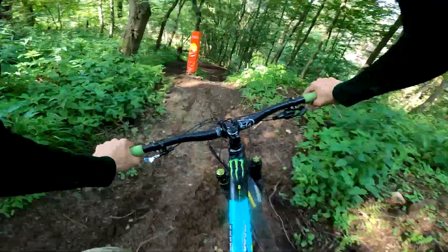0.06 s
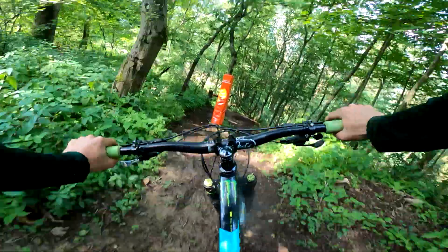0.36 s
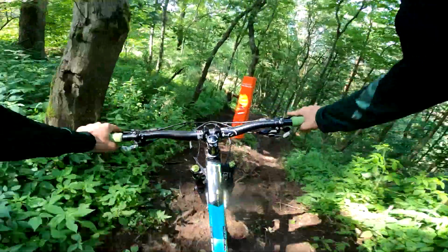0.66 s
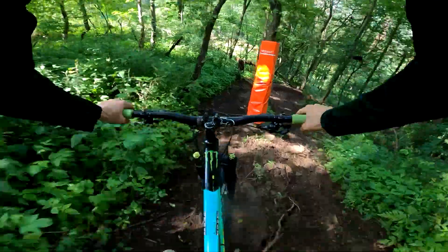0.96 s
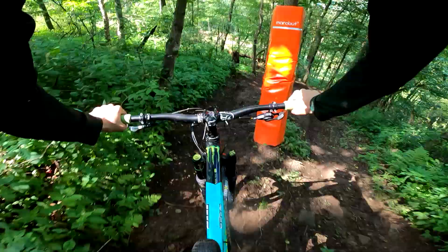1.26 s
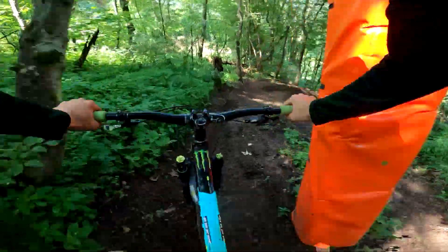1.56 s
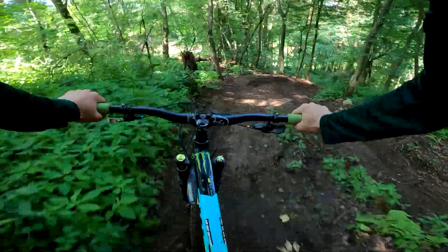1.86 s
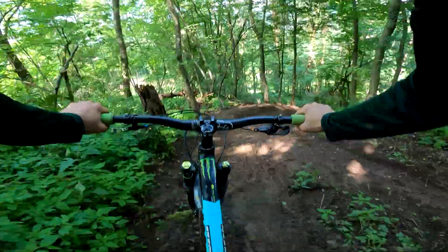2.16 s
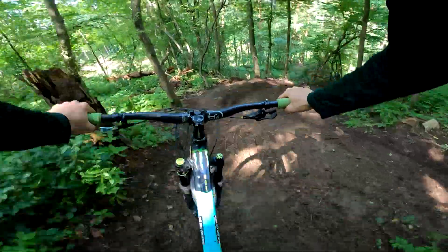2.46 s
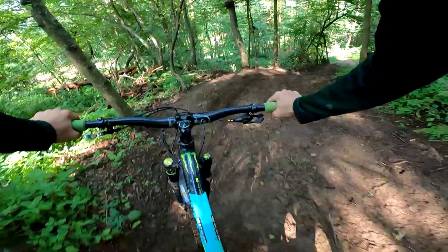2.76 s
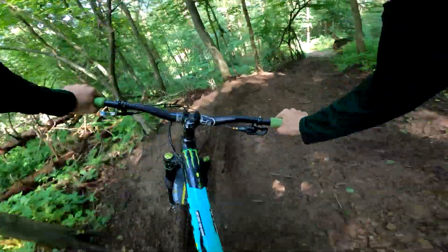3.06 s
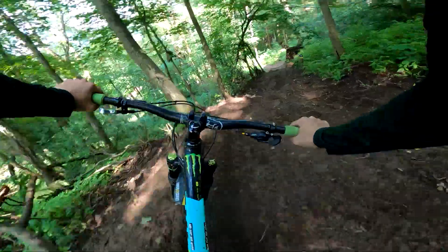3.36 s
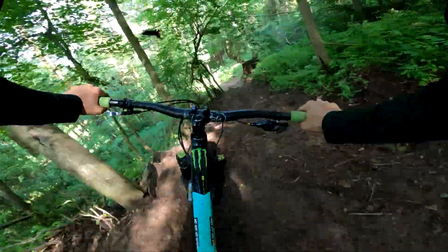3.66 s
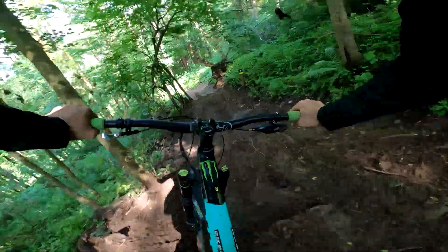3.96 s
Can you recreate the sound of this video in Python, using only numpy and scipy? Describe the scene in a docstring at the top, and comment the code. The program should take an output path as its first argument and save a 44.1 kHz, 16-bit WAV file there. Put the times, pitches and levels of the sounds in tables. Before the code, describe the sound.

A loud, wavering howl comes from wet mountain bike brakes, once at the start and twice more after a bumpy stretch of thuds and clacks. Heard from the rider's chest, with tyres crunching over soil and wind buffeting the microphone.

```python
"""A dirt trail, heard from the chest of a mountain biker riding down it. The wet disc brakes howl in
three pulls: two rotors stick and slip at nearby pitches and beat against each other, with brief, very
high chirps of pad on steel. Tyres rumble and crunch over the soil, the wheels whirr and wind thumps
on the microphone. Between the first two pulls, roots thud through the frame and bumps set off most
of the rattles."""
import sys
import numpy as np
from scipy.fft import rfft, irfft, next_fast_len
from scipy.io import wavfile
from scipy.ndimage import uniform_filter1d, minimum_filter1d, map_coordinates

SR = 44100
rng = np.random.default_rng(int(sys.argv[2]) if len(sys.argv) > 2 else 0)


def output_pcm(signal):
    """Save a mono or channel-first signal as 16-bit PCM at the path in sys.argv[1].

    Samples are clipped to [-1, 1] before scaling.
    """
    pcm = np.clip(np.atleast_2d(signal).T, -1, 1) * 32767
    wavfile.write(sys.argv[1], SR, np.round(pcm).astype(np.int16))


N = 176400


def amp(db):
    """Decibels to gain."""
    return 10 ** (np.asarray(db) / 20)


def unit(x):
    """Scale to rms 1."""
    return x / np.sqrt(np.mean(np.abs(x) ** 2) + 1e-20)


def clock():
    """Time of every sample in seconds."""
    return np.arange(N) / SR


def along(points, hz):
    """Read (Hz, value) points on a log frequency axis."""
    freqs, values = np.transpose(points)
    return np.interp(np.log(hz + 1), np.log(freqs + 1), values)


def curves(rows):
    """One automation curve for each column after the time."""
    times, *columns = np.transpose(rows)
    return [np.interp(clock(), times, column) for column in columns]


def wobble(rate):
    """A smooth random curve, rate knots a second."""
    return map_coordinates(rng.standard_normal(8192), [clock() * rate], mode="wrap")


def filtered(x, response):
    """Equalise x with a gain given as a function of frequency."""
    size = next_fast_len(N + 8192)
    return irfft(rfft(x, size) * response(np.fft.rfftfreq(size, 1 / SR)), size)[..., :N]


# Stereo image of the noises. Each row: frequency in Hz, left-right coherence (1 is mono).
COHERENCE = [(90, 1), (180, .999999), (1400, .99999), (2200, .9996), (4000, .992), (9000, .988),
             (11000, .985), (13000, .65)]


def noise(colour, grain_db=0):
    """Nearly mono coloured noise of rms 1; grain_db clumps it into millisecond grains."""
    def mid_side_gains(hz):
        width = np.arccos(np.clip(along(COHERENCE, hz), -1, 1)) / 2
        return amp(along(colour, hz)) * [np.cos(width), np.sin(width)]

    white = rng.standard_normal((2, N)) * amp(grain_db * wobble(700))
    mid, side = filtered(white, mid_side_gains)
    return unit(np.array([mid + side, mid - side]))


def rotor(pitch, partials, rough, jitter, jitter_rate, flutter_db, flutter_rate, scatter, shift_hz=0):
    """Stick-slip tone: the pitch jitters, the grip falters, and the partials drift, blur and flare."""
    phase = 2 * np.pi * np.cumsum(pitch * (1 + jitter * rough * wobble(jitter_rate))) / SR
    falter = np.tanh(0.42 * amp(flutter_db * rough * wobble(flutter_rate)))
    shift = 2 * np.pi * shift_hz * clock()
    out = np.zeros(N)
    for k, db in partials:
        order = min(k, 4)
        spread = scatter * rough * order
        blur = 1 + spread * (wobble(55 * order) + 1j * wobble(55 * order))
        flare = amp(4 * wobble(45) * (k > 2))
        drift = 0.23 * order * wobble(15) - k * np.pi / 2
        grip = unit(blur * falter * flare / np.sqrt(1 + 2 * spread ** 2))
        out += amp(db) * np.sqrt(2) * np.imag(grip * np.exp(1j * (k * phase + drift + shift)))
    return out


# The howl's envelopes, one list per pull of the brakes. Each row: time in seconds, then relative
# levels in dB of the fundamental, the octave, the third partial and the upper partials.
PULLS = [
    [(0.0, -24, -22.5, -40, -44), (0.016, -25.5, -25.5, -40, -40), (0.086, -21, -22, -39, -49.5),
     (0.29, -27.5, -32, -53, -62), (0.332, -25.5, -33.5, -45, -54), (0.374, -23, -27.5, -44, -54),
     (0.402, -26, -27.5, -32, -42), (0.466, -22.5, -29.5, -48, -61), (0.524, -34, -35.5, -55, -69),
     (0.552, -36.5, -34, -44, -72), (0.634, -33, -42.5, -53, -67), (0.684, -47, -42, -71, -73),
     (0.706, -41, -56, -58, -59), (0.718, -37, -58, -73, -73), (0.8, -45, -65, -71, -69)],
    [(1.7, -34, -52, -63, -47), (1.844, -26, -40.5, -51, -55), (1.914, -31, -27, -47, -70),
     (1.986, -25.5, -26, -32, -37.5), (2.006, -17.5, -33.5, -37, -52), (2.052, -30.5, -24, -33, -41.5),
     (2.114, -22.5, -27, -32, -40.5), (2.146, -26, -35.5, -49, -47), (2.194, -32, -29.5, -38, -48),
     (2.248, -24, -34.5, -46, -59.5), (2.316, -30.5, -16.5, -28, -40.5), (2.332, -33, -28.5, -35, -42),
     (2.396, -28.5, -23.5, -36, -50), (2.522, -44, -44, -64, -56), (2.544, -32.5, -46, -66, -77),
     (2.58, -47, -58, -73, -72)],
    [(2.68, -44, -47.5, -53.5, -54), (2.724, -42, -51, -62, -59), (2.778, -38.5, -45, -53, -54),
     (2.808, -43.5, -41, -66, -74), (2.888, -25, -24, -37.5, -48.5), (2.94, -25, -29, -30, -40),
     (2.958, -20.5, -28.5, -33, -55), (3.01, -28.5, -31.5, -48, -56), (3.05, -21, -25, -33.5, -47.5),
     (3.072, -18.5, -21, -27, -38), (3.164, -28, -32, -42, -43), (3.18, -28.5, -29.5, -26, -33.5),
     (3.23, -25.5, -29.5, -51, -50.5), (3.264, -27.5, -23.5, -34, -48.5), (3.414, -31.5, -27.5, -46, -52),
     (3.448, -26, -21.5, -27, -44), (3.606, -27, -25, -32.5, -41.5), (3.62, -29.5, -22.5, -38, -45),
     (3.756, -32.5, -20.5, -38.5, -44), (3.778, -39.5, -31, -44, -55), (3.826, -30, -24.5, -44.5, -47),
     (3.886, -34.5, -33.5, -53, -76), (3.904, -35, -32, -42.5, -49), (4.0, -31.5, -33, -42, -57)],
]
# The howl's bright edge. Each row: harmonic number, dB against the upper partials' envelope.
UPPER_PARTIALS = [(4, -0.5), (5, -6), (6, -18), (7, -12), (8, -17), (9, -21.5), (10, -23.5), (13, -25.5)]
# The main rotor's wavering note. Each row: time in seconds, pitch in Hz.
HOWL_PITCH = [(0, 702), (.13, 694.1), (.27, 680.7), (.42, 696), (.5, 687), (.66, 666.8), (.8, 689.4),
              (1.9, 682.2), (2.0, 697), (2.12, 708.2), (2.2, 686.2), (2.42, 686.5), (2.6, 677),
              (2.9, 693.1), (3.05, 700), (3.14, 718.5), (3.2, 684.9), (3.27, 682), (3.46, 695), (3.62, 690),
              (3.75, 678), (3.82, 697.5), (3.87, 676.6), (3.93, 709.3), (4, 697)]
# The second rotor's bite against the first. Each row: time in seconds, relative level in dB.
SECOND_GRIP = [(0, 3), (.27, 6), (.4, 1.5), (.7, -2.5), (1.8, 3.5), (2, -6), (2.12, -6), (2.24, 9.5),
               (2.32, -9), (2.45, 4), (2.9, -7), (3.08, -7), (3.2, -1.5), (3.35, 0), (3.5, -10), (3.6, 0),
               (3.74, -8), (3.95, -1)]
# EQ of the rubbing pads. Each row: frequency in Hz, gain in dB.
RASP_EQ = [(300, -64), (600, 11.5), (1000, -8), (1750, 7.5), (2500, -11), (4000, -10), (6000, -34),
           (9000, -36), (12000, -37), (15500, -33)]
SECOND_MEAN_HZ, SECOND_TILT_DB_PER_OCTAVE = 742.2, -8


def brakes():
    """Two rotors howl over rasping pads; the second roughens the first and makes sum tones with it."""
    fundamental_db, octave_db, third_db, upper_db = curves(np.vstack(PULLS))
    third_db = np.minimum(third_db, octave_db - 6.5)
    upper_db = np.minimum(upper_db, octave_db - 8)
    pitch, = curves(HOWL_PITCH)
    grip_db, = curves(SECOND_GRIP)
    totals = [(1, fundamental_db + 0.5), (2, octave_db + 1), (3, third_db + 1)]
    totals += [(round(k), upper_db + db) for k, db in UPPER_PARTIALS]
    # Each partial's power is shared among the two rotors and their sum tones.
    main_partials, second_partials, sum_partials = [], [], []
    sum_db = grip_db - 8
    for k, total_db in totals:
        second_db = grip_db - 0.5 + SECOND_TILT_DB_PER_OCTAVE * np.log2(k)
        main_db = total_db - 10 * np.log10(1 + amp(second_db) ** 2 + (k > 1) * amp(sum_db) ** 2)
        main_partials.append((k, main_db))
        second_partials.append((k, main_db + second_db))
        sum_partials.append((k, main_db + sum_db))
    main = rotor(pitch, main_partials, rough=amp(0.45 * grip_db),
                 jitter=0.011, jitter_rate=170, flutter_db=2.5, flutter_rate=120, scatter=0.3)
    second = rotor(SECOND_MEAN_HZ * pitch / pitch.mean(), second_partials[:4], rough=0.918,
                   jitter=0.01612, jitter_rate=90, flutter_db=2.5, flutter_rate=70, scatter=0.9)
    sum_tones = rotor(pitch, sum_partials[1:5], rough=0.895, shift_hz=SECOND_MEAN_HZ - pitch.mean(),
                      jitter=0.014, jitter_rate=90, flutter_db=4, flutter_rate=38, scatter=0.6)
    rasp = amp(upper_db - 3) * noise(RASP_EQ)
    # The howl ducks between the first pull and the second.
    let_go, pull = PULLS[0][-1][0], PULLS[1][0][0]
    duck = np.interp(clock(), [let_go, let_go + 0.22, pull - 0.05, pull, pull + 0.19],
                     [0.99, 0.14, 0.11, 0.67, 1])
    return duck * (main + second + sum_tones + rasp)


# Fader moves for the tyres' low rumble, midrange scrub, gritty crunch and airy hiss.
# Each row: time in seconds, relative level in dB.
RUMBLE_FADER = [(0, -20.5), (.08, -31.5), (.5, -41.5), (.6, -45), (.75, -47), (.95, -54), (1.11, -50),
                (1.16, -35.5), (1.4, -32), (1.6, -29), (1.8, -30.5), (2.06, -28.5), (2.3, -32.5),
                (2.4, -41), (2.49, -28), (2.56, -40), (2.76, -28), (3, -36), (3.3, -35.5), (3.6, -42.5),
                (4, -43.5)]
SCRUB_FADER = [(0.0, -46), (0.27, -43), (0.3, -37), (0.83, -60.5), (1.51, -44), (1.55, -43), (1.61, -42.5),
               (1.85, -37.5), (1.86, -42.5), (2.27, -38), (2.29, -50), (2.49, -37), (2.54, -50.5),
               (2.86, -42.5), (3.73, -57.5), (4.0, -47)]
CRUNCH_FADER = [(0.02, -52.5), (0.86, -64.5), (0.99, -56), (1.68, -47.5), (1.72, -45.5), (1.78, -46.5),
                (1.89, -47), (2.04, -56), (2.07, -49.5), (2.49, -55.5), (2.52, -65.5), (2.95, -53),
                (2.99, -59), (3.1, -52.5), (3.43, -60.5), (3.48, -47), (3.58, -60), (4.0, -64.5)]
HISS_FADER = [(0, -70), (.6, -62.5), (.85, -63), (1.2, -58.5), (1.7, -76), (2.05, -69), (2.5, -73),
              (2.65, -61), (2.9, -61), (4, -65.5)]
# EQ of the same four layers. Each row: frequency in Hz, gain in dB.
RUMBLE_EQ = [(30, -7.5), (100, -2), (160, -1.5), (205, 3.5), (265, -4.5), (335, 0.5), (440, -5.5),
             (520, -15), (900, -20), (2500, -73)]
SCRUB_EQ = [(200, -31), (500, 4), (750, 5), (1100, -2), (1600, 0.5), (2100, -9.5), (2600, -13), (3200, -21),
            (6000, -45)]
CRUNCH_EQ = [(1200, 6.5), (2500, 2.5), (3800, 5.5), (5500, 1.5), (7800, -7), (9000, -5), (11000, -12.5),
             (12800, -20), (14000, -40), (15700, -47)]
HISS_EQ = [(3000, -33), (5500, -6), (7500, 0.5), (9000, 0.5), (10500, 0), (12000, -5.5), (14000, -10),
           (15700, -29)]


def tyres():
    """Knobbly tyres drum on the ground, scrub the soil, crunch grit and hiss."""
    bumps = wobble(35.46)
    rumble = amp(curves(RUMBLE_FADER)[0] - 2 + 1.67 * bumps) * noise(RUMBLE_EQ, grain_db=5)
    scrub = amp(curves(SCRUB_FADER)[0] + 5 + 2.42 * bumps) * noise(SCRUB_EQ, grain_db=3.5)
    crunch_db = curves(CRUNCH_FADER)[0] + 4.5 + 1.93 * bumps + 1.8 * wobble(120)
    crunch = amp(crunch_db) * noise(CRUNCH_EQ, grain_db=1)
    hiss = amp(curves(HISS_FADER)[0] + 1.3 * wobble(120)) * noise(HISS_EQ, grain_db=2)
    return rumble + scrub + crunch + hiss


# Fader moves for the whirr. Each row: time in seconds, level in dB.
WHIRR_FADER = [(0, -50), (.6, -55.5), (.9, -49), (1.3, -40), (1.9, -48), (2.3, -69), (2.55, -51.5),
               (2.8, -46), (3.3, -54), (4, -47)]
# The whirr's EQ, with narrow peaks up top. Each row: frequency in Hz, gain in dB.
WHIRR_EQ = [(900, 0.5), (1400, 0), (2100, 1.5), (2600, -0.5), (3100, -12), (4400, -10.5), (4800, -27),
            (5350, -23), (5540, -7), (5750, -19), (8500, -51), (8950, -17), (9400, -26), (15000, -66)]


def wheels():
    """Spinning wheels and rotors whirr lightly, with faint metallic resonances."""
    return amp(curves(WHIRR_FADER)[0] + 3.1 * wobble(60)) * noise(WHIRR_EQ, grain_db=-2)


# Fader moves for the wind bed. Each row: time in seconds, level in dB.
WIND_FADER = [(0, -42), (.3, -37.5), (.5, -40), (.6, -40.5), (.88, -28.5), (.95, -36), (1.06, -29.5),
              (1.12, -41.5), (1.28, -27.5), (1.5, -27.5), (1.85, -51), (2.0, -36), (2.25, -35.5),
              (2.7, -40.5), (3.2, -35), (3.7, -43), (3.8, -29.5), (3.9, -41), (4, -52)]
# Gusts and jolts at the microphone. Each row: start in seconds, length in seconds, level in dB.
THUMPS = [(0, 0.084, -39), (0.392, 0.029, -29), (0.481, 0.053, -26.5), (0.801, 0.0266, -26),
          (0.855, 0.054, -28.5), (0.972, 0.022, -23), (1.011, 0.056, -27), (1.24, 0.042, -29),
          (1.269, 0.051, -32), (1.962, 0.17, -31), (2.193, 0.077, -35), (3.22, .03, -35)]
# Bass-heavy EQ of the bed and the thumps. Each row: frequency in Hz, gain in dB.
WIND_EQ = [(10, 3.5), (25, 0), (45, 5.5), (80, -2.5), (120, -5.5), (200, -12.5), (400, -23.5), (1000, -65)]
THUMP_EQ = [(15, 6), (40, 8.5), (80, 10.5), (130, 4.5), (200, 1.5), (300, -13), (500, -12), (1000, -32),
            (3000, -90)]


def wind():
    """Air buffets the microphone: a low bed with separate thumps on top."""
    t = clock()
    attack_s, release_s = 0.005, 0.012
    bed = amp(curves(WIND_FADER)[0] + 0.81 * wobble(18)) * noise(WIND_EQ)
    gusts = np.zeros(N)
    for start, length, db in THUMPS:
        ramps = np.minimum((t - start) / attack_s, (start + length - t) / release_s + 1)
        gusts += amp(db) * np.clip(ramps, 0, 1)
    return bed + gusts * noise(THUMP_EQ)


# Chirps of pad on steel. Each row: peak time in seconds, relative level in dB.
CHIRPS = [(0.361, -59), (1.688, -58), (2.043, -57), (2.1, -41.5), (2.171, -47.5), (2.234, -47.5),
          (2.298, -54), (2.383, -41.5), (2.705, -58), (2.727, -58), (2.79, -60), (2.858, -58), (2.93, -59),
          (2.999, -34), (3.012, -44), (3.06, -43.5), (3.458, -53)]
# The rotor's glassy top modes. Each row: frequency in Hz, rough width in Hz, relative level in dB.
ROTOR_MODES = [(11350, 450, -17), (12030, 220, -8), (12690, 110, 5), (12950, 220, -2), (13400, 400, -17)]
# Stereo placement of the chirps. Each row: frequency in Hz, mean phase lead of the left in radians.
CHIRP_LEAD = [(11400, .25), (12000, 1.3), (12700, 1.4)]


def chirps():
    """Pad and rotor touch briefly and sing on the rotor's highest modes, a little to the right."""
    t = clock()
    rise_s, fall_s = 0.0066, 0.009
    touch = sum(amp(db) * np.exp(-np.maximum((peak - t) / rise_s, (t - peak) / fall_s))
                for peak, db in CHIRPS)
    ring = np.zeros((2, N))
    for hz, width, db in ROTOR_MODES:
        phase = 2 * np.pi * hz * t + 1.8 * wobble(width)
        lead = along(CHIRP_LEAD, hz) * (1 + 0.38 * wobble(300))
        left, right = amp(-2.6 * lead) * np.cos(phase + lead), np.cos(phase)
        ring += amp(db) * (1 + 0.21 * wobble(width)) * np.array([left, right])
    return amp(4) * touch * unit(ring)


# Hits on roots. Each row: start in seconds, level in dB, treble tilt in dB per octave.
THUDS = [(.655, -23.5, 2.5), (0.812, -18, -1), (.872, -20.5, -0.5), (.985, -18, 3.5), (1.027, -25, 1.5),
         (1.13, -30, 7)]
# The frame's body. Each row: frequency in Hz, relative level in dB, seconds to fall 60 dB.
FRAME_MODES = [(108.4, 1.5, 0.078), (199, -1.5, .06), (317, -3, 0.036), (556, -3, 0.021), (830, -25, .031),
               (1050, -27, .024)]


def thuds():
    """A wheel strikes a root and the frame answers with damped modes, detuned anew on each hit."""
    out = np.zeros(N)
    for start, db, tilt_db in THUDS:
        age = np.maximum(clock() - start, 0)
        attack = 1 - np.exp(-age / 0.0013)
        for hz, mode_db, t60 in FRAME_MODES:
            decay = amp(mode_db + tilt_db * np.log2(hz / 200) - 60 * age / t60)
            detuned_hz = hz * (1 + 0.058 * rng.standard_normal())
            out += amp(db) * attack * decay * np.sin(2 * np.pi * detuned_hz * age)
    return out


# Clacks over bumps. Each row: start in seconds, level in dB, treble tilt in dB per octave,
# seconds to fall 60 dB.
CLACKS = [(1.023, -37, 2, 0.08), (1.183, -32, 0, 0.11), (1.245, -21.5, -4.5, 0.1), (1.345, -29, 0.5, .12),
          (1.465, -23, -2, 0.081), (1.518, -30.5, 2.5, 0.068), (1.546, -18.5, -2.5, .06),
          (1.687, -26, -3.5, .06), (1.709, -26.5, 3.5, 0.042), (1.743, -19, -1, 0.019),
          (1.784, -22.5, -4, 0.073), (1.837, -23.5, -2.5, .09), (2.481, -34, -0.5, 0.12),
          (2.685, -27, -2.5, 0.049), (2.939, -23, -2, 0.039)]
# A clack's EQ before its tilt. Each row: frequency in Hz, gain in dB.
CLACK_EQ = [(100, 3), (350, -3.5), (800, 7), (1500, 1), (2500, -5), (4500, -10), (7500, -22), (10000, -28),
            (15000, -82)]


def rattles():
    """Bumps shake short, dry clacks out of the frame and chain."""
    out = np.zeros((2, N))
    for start, db, tilt_db, t60 in CLACKS:
        age = np.maximum(clock() - start, 0)
        attack = np.minimum(age / 0.001, 1)
        tilted_eq = [(hz, gain_db + tilt_db * np.log2(hz / 1000)) for hz, gain_db in CLACK_EQ]
        out += amp(db - 60 * age / t60) * attack * noise(tilted_eq, grain_db=4.5)
    return out


def scene():
    """The dry mix: every source rides along with the microphone."""
    return brakes() + chirps() + tyres() + wheels() + rattles() + thuds() + wind()


def record(dry):
    """The camera's limiter holds down the peaks, and its band limit cuts the very top."""
    ceiling, hold_s, top_hz = 0.22, 0.0022, 15700
    hold = int(hold_s * SR)
    needed_gain = np.minimum(1, ceiling / (np.abs(dry).max(axis=0) + 1e-9))
    gain = uniform_filter1d(minimum_filter1d(needed_gain, hold), hold)
    fades = np.interp(clock(), [0, 0.003, N / SR - 0.003, N / SR], [0, 1, 1, 0])
    return filtered(dry * gain * fades, lambda hz: hz < top_hz)


dry = scene()
out = record(dry)
output_pcm(out)
```